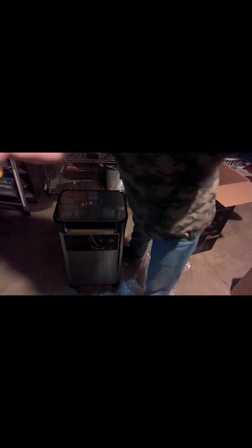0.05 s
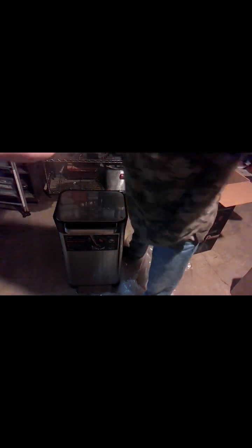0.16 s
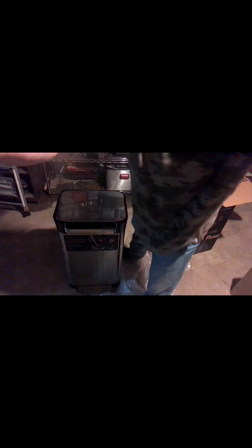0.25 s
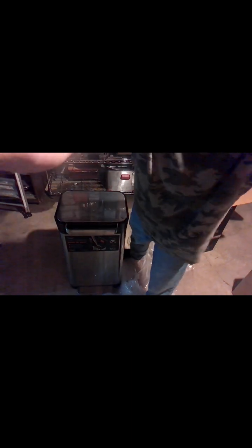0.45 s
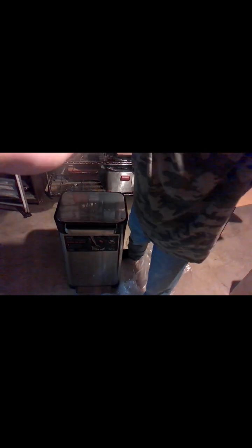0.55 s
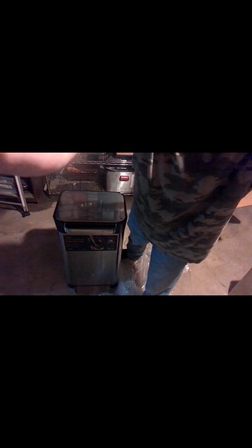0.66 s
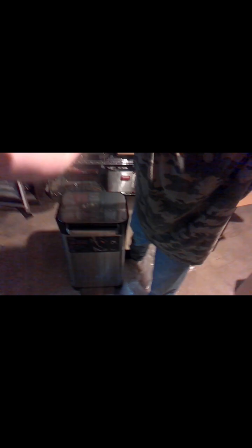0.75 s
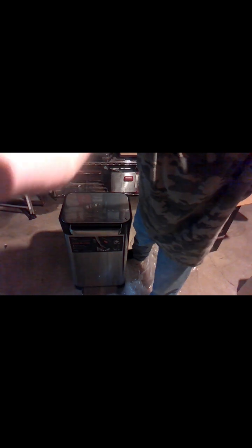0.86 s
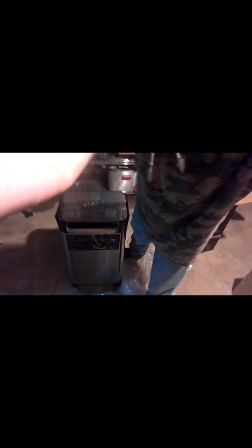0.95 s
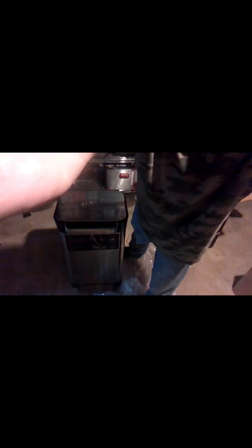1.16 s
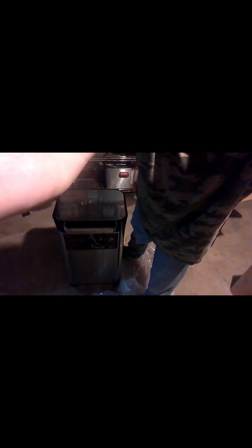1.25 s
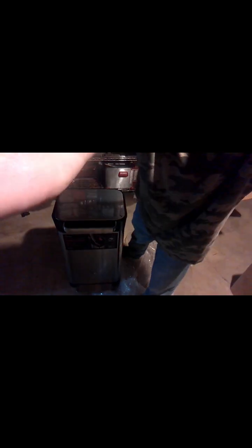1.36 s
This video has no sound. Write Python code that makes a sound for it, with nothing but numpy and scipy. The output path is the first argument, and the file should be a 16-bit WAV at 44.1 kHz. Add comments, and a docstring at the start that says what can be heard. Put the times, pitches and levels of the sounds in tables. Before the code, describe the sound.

A steel bin is shuffled over a hard floor with hollow bumps and scrapes, then set down with two heavy, clacking thumps that overload the microphone. Packaging rustles faintly in the small basement.

```python
"""In a small basement, a stainless-steel bin is shuffled over the hard floor and set down with two
heavy thumps. Each bump booms in the hollow body, and hard contacts clack and ring the steel walls.
The base scrapes and gives short hollow rubs. Faint squeaks and rustling packaging are heard, the
room answers with a short echo, and the loudest thumps overload the microphone."""
import sys
import numpy as np
from scipy import signal
from scipy.fft import rfft, irfft, next_fast_len
from scipy.io import wavfile

SR = 44100
rng = np.random.default_rng(int(sys.argv[2]) if len(sys.argv) > 2 else 0)


def persist_wave(psi):
    """Save psi, clipped to +-1, as 16-bit WAV."""
    counts = np.round(np.clip(psi, -1, 1) * 32767).astype(np.int16)
    wavfile.write(sys.argv[1], SR, np.atleast_2d(counts).T)


N = 61739


# The bin bumps the floor. Each row: start in seconds, level in dB, contact time in seconds.
BUMPS = [(0.0218, -31, 0.014), (0.121, -31, 0.013), (0.1439, -23.5, 0.015), (0.179, -26, 0.015),
         (0.2171, -5.5, 0.024), (0.254, -14.5, 0.02), (0.2913, -16.5, 0.009), (0.3487, -6.5, 0.019),
         (0.385, -18.5, 0.011), (0.4271, -19.5, 0.031), (.5583, -4.8, .0092), (.5695, -3.6, .012),
         (.5871, -21, .0058), (.7477, -7.9, .0155), (.7862, -13.6, .022), (1.0827, -4.4, .0068),
         (1.0931, -8.2, .0052), (1.097, -5.6, .0146), (1.2248, -24, 0.016), (1.2953, -31.5, 0.013)]
# The body's deep notes. Each row: pitch in Hz, level in dB, seconds to fade by 60 dB.
BODY_NOTES = [(28, -24, .45), (55.8, .3, .26), (83.2, 2.1, .1), (106, -4.3, .07), (148, -5, .14),
              (177, -4, .1)]

def boom(t):
    """Each bump pushes on the hollow body, which booms with its own deep notes."""
    force = sum(undb(db) * push(t - start, contact) for start, db, contact in BUMPS)
    return through(force, ring(t, BODY_NOTES))


# How strong the rumble is. Each row: time in seconds, level in dB.
RUMBLE_LEVELS = [(0, -54), (.05, -43), (.11, -53), (.17, -33), (.3, -31), (.42, -26), (.53, -38),
                 (.62, -31), (.72, -38), (.83, -27), (.9, -36), (1.06, -35), (1.13, -30), (1.27, -34),
                 (1.4, -44)]
# The rumble's tone. Each row: frequency in Hz, level in dB.
RUMBLE_COLOUR = [(12, -26.5), (26, 4), (38, -3.5), (56, -3.5), (75, -8.5), (105, -15), (150, -26),
                 (250, -37), (500, -61), (2000, -120)]

def rumble(t):
    """The flexing body rumbles on between the bumps."""
    return curve(t, RUMBLE_LEVELS) * colour(rng.standard_normal(N), RUMBLE_COLOUR)


# Lid and rim click. Each row: start in seconds, level in dB, wall clack in dB, tink pitch in Hz.
CLICKS = [(0.2393, -50.5, -45, 9550), (0.3228, -44, -14.5, 3580), (0.3962, -44, -11.5, 10000),
          (0.4019, -44, -22, 2940), (0.494, -51.5, -41.5, 6960), (0.559, -49, -6.5, 4740),
          (.573, -50, -9, 3440), (0.7481, -61.5, -19, 2435), (1.0838, -39, 2.5, 3100),
          (1.088, -51.5, -12, 4410), (1.094, -46, -8.5, 2590), (1.2277, -56.5, -20, 4640)]
# The clicks' tone. Each row: frequency in Hz, level in dB.
CLICK_COLOUR = [(800, -0.5), (2000, 7), (3000, 4.5), (5000, -1), (7000, -1.5), (8200, -10.5), (10000, -8.5),
                (11500, -7.5)]
# The lid ticks in its seat. Each row: start in seconds, level in dB.
LID_TICKS = [(0.3212, -43.5), (0.33, -52.5)]
# The lid's high notes. Each row: pitch in Hz, level in dB, seconds to fade by 60 dB.
LID_NOTES = [(5920, -3, 0.016), (7120, -3, .013), (9000, -10.5, 0.014)]

def clicks(t):
    """Lid and rim give short bright cracks, each with its own tink, and the lid ticks."""
    hiss = colour(rng.standard_normal(N), CLICK_COLOUR)
    out = np.zeros(N)
    for start, db, _, hz in CLICKS:
        crack = hiss * strike(t - start, rise_s=0.0005, fade_s=0.013)
        tink = band(hz, width_hz=1200) * strike(t - start, rise_s=0.0005, fade_s=0.027)
        out += undb(db) * (crack + undb(-10) * tink)
    return out + sum(undb(db) * ring(t - start, LID_NOTES, np.sin) for start, db in LID_TICKS)


# The steel walls' notes. Each row: pitch in Hz, level in dB, seconds to fade by 60 dB.
WALL_NOTES = [(233, 5.5, 0.04), (297, 0.5, 0.054), (456.6, -3, 0.2), (544.3, 3, 0.19), (707, -6, 0.044),
              (769, -23.5, 0.027), (941, -3, 0.077), (1193, -8.5, 0.13), (1300, -6.5, 0.16),
              (1670, -16.5, 0.12), (2010, -16.5, 0.12), (2395, -7, 0.053), (2650, -18.5, 0.16),
              (2940, -16.5, 0.18)]
# The tone of loose parts clattering. Each row: frequency in Hz, level in dB.
CLATTER_COLOUR = [(150, 4.5), (300, -1.5), (400, 0), (600, 0), (1200, -10.5), (2000, -19.5), (3200, -20),
                  (5000, -34.5), (8000, -49), (11000, -51)]

def walls(t):
    """Bumps and clicks ring the steel and set loose parts clattering."""
    blows = [(start + contact / 2, db - 19) for start, db, contact in BUMPS]
    blows += [(start, clack_db) for start, _, clack_db, _ in CLICKS]
    force = sum(undb(db) * push(t - start, contact_s=0.00055) for start, db in blows)
    steel = through(force, ring(t, WALL_NOTES, np.sin))
    jolts = [undb(db) * strike(t - start, rise_s=0.002, fade_s=0.068) for start, db in blows]
    shaking = np.sqrt(sum(jolt ** 2 for jolt in jolts))
    clatter = shaking * colour(grit(rough_db=2.5), CLATTER_COLOUR)
    return undb(-38) * steel + undb(-27.5) * clatter


# Knocks on single panels. Each row: start in seconds, level in dB, pitch in Hz.
KNOCKS = [(0.3972, -36.5, 1189), (.5635, -33, 674), (0.579, -41.5, 1097), (1.0833, -38, 1298)]

def knocks(t):
    """A struck panel gives a short hollow note and a weaker, out-of-tune one above it."""
    fade_s = 0.04
    return sum(ring(t - start, [(hz, db, fade_s), (hz * 1.4, db - 9.5, fade_s)], np.sin)
               for start, db, hz in KNOCKS)


# Dull pops. Each row: start in seconds, level in dB, length in seconds, pitch in Hz.
POPS = [(0.115, -43, 0.093, 152.6), (0.284, -36.5, 0.043, 150), (0.389, -49.5, 0.07, 159),
        (0.565, -18.5, 0.013, 310.5), (0.739, -38.5, 0.064, 163.6), (1.086, -33, 0.037, 221)]

def pops(t):
    """Short, dull, fairly low pops on the bumps; the loudest is the blare of an overloaded thump."""
    return sum(undb(db) * swell(t - start, length) * band(hz, width_hz=40)
               for start, db, length, hz in POPS)


# Hollow rubs of the base. Each row: start in seconds, level in dB, length in seconds.
RUBS = [(.218, -46, 0.02), (0.306, -38.5, 0.041), (0.394, -36, 0.038), (0.564, -40.5, 0.031),
        (1.078, -29.5, 0.035), (1.195, -42, 0.059)]

def rubs(t):
    """The base catches on the floor: a short hoot that drops in pitch and rings on faintly."""
    start_hz, drop_hz_per_s = 570.4, 720
    out = np.zeros(N)
    for start, db, length in RUBS:
        age = t - start
        hz = start_hz - drop_hz_per_s * np.clip(age, 0, length)
        hoot = np.sin(2 * np.pi * np.cumsum(hz * (age > 0)) / SR)
        tail = undb(-17) * np.clip(age / length, 0, 1) * fade(age, fade_s=0.28)
        out += undb(db) * (swell(age, length) + tail) * hoot
    return out


# How hard the base scrapes. Each row: time in seconds, level in dB.
SCRAPE_LEVELS = [(0, -73), (.08, -57.5), (.12, -69), (.17, -53), (.21, -54.5), (.3, -44.5), (.36, -47.5),
                 (.42, -53.5), (.52, -56.5), (.555, -50.5), (.62, -48.5), (.68, -56.5), (.77, -48),
                 (.88, -55), (1.02, -60.5), (1.085, -41), (1.15, -53.5), (1.4, -68)]
# The scrape's tone. Each row: frequency in Hz, level in dB.
SCRAPE_COLOUR = [(100, 2.5), (180, 1.5), (300, -2), (600, -6.5), (1200, -16), (1800, -21.5), (3000, -34.5),
                 (5000, -43.5), (8000, -55), (11000, -58)]

def scrape(t):
    """The base grinds over the floor, which also makes the walls sing."""
    singing = unit(through(grit(rough_db=0.5), ring(t, WALL_NOTES, np.sin)))
    grinding = colour(grit(rough_db=4), SCRAPE_COLOUR)
    return curve(t, SCRAPE_LEVELS) * (grinding + undb(-12) * singing)


# Two clacks, then squeaks. Each row: start in seconds, level in dB, length in seconds, pitch in Hz.
CLACKS_AND_SQUEAKS = [(0.376, -50.5, 0.014, 1314), (0.393, -49.5, 0.0093, 2090), (0.395, -69.5, 0.12, 2750),
                      (0.546, -56, 0.027, 2960), (0.699, -62.5, 0.025, 3450), (.744, -63.5, 0.012, 3290),
                      (0.859, -74.5, 0.035, 3580), (1.348, -75, 0.049, 5650), (1.375, -68.5, 0.034, 5400)]

def clacks_and_squeaks(t):
    """Two short clacks, then thin, brief squeaks, each a burst of noise around one pitch."""
    return sum(undb(db) * np.sqrt(swell(t - start, length)) * band(hz, width_hz=450)
               for start, db, length, hz in CLACKS_AND_SQUEAKS)


# Packaging rustles. Each row: start in seconds, level in dB, length in seconds, centre in Hz.
RUSTLES = [(0.035, -67, 0.074, 2700), (0.127, -70.5, 0.21, 3400), (0.246, -62, 0.14, 3050),
           (0.331, -64.5, 0.12, 3300), (0.533, -63.5, 0.029, 2940), (0.701, -66, 0.039, 1680),
           (1.027, -64.5, 0.091, 2870), (1.291, -63.5, 0.068, 2360), (1.36, -62.5, 0.046, 1900)]

def packaging(t):
    """Packaging crinkles in brief bursts, each with its own brightness."""
    octaves = np.arange(-3, 4)
    hump_db = -10 * np.log10(1 + (octaves / 0.48) ** 4)  # loudest at the centre
    out = np.zeros(N)
    for start, db, length, hz in RUSTLES:
        crinkles = colour(grit(rough_db=3.5), np.c_[hz * 2. ** octaves, hump_db])
        out += undb(db) * np.sqrt(swell(t - start, length)) * crinkles
    return out


def basement(t, sound):
    """The small room adds a blur of quick echoes; the treble dies first."""
    noise = rng.standard_normal(N)
    low = signal.sosfilt(signal.butter(2, 2500, fs=SR, output="sos"), noise)
    age = t - 0.0039  # the first echo comes back after 3.9 ms
    tail = low * fade(age, fade_s=0.19) + (noise - low) * fade(age, fade_s=0.15)
    return sound + undb(-11) * through(sound, tail / np.sqrt(np.sum(tail ** 2)))


# The background's tone. Each row: frequency in Hz, level in dB.
AIR_COLOUR = [(30, 7), (100, -3.5), (300, -41), (1000, -18), (3000, -30), (8000, -39.5), (11000, -42)]

def air():
    """A faint, steady rush fills the room."""
    return undb(-61) * colour(rng.standard_normal(N), AIR_COLOUR)


def undb(db):
    """Turn decibels into a number to multiply by."""
    return 10 ** (np.asarray(db) / 20)


def curve(t, rows):
    """A volume that glides through (seconds, dB) points."""
    return undb(np.interp(t, *np.array(rows).T))


def unit(x):
    """Scale a sound to an average power of 1."""
    return x / np.sqrt(np.mean(x ** 2))


def filtered(x, gain):
    """Turn each frequency up or down, then scale to a power of 1."""
    size = next_fast_len(N, real=True)
    hz = np.maximum(np.arange(size // 2 + 1) * SR / size, 1)
    return unit(irfft(rfft(x, size) * gain(hz), size)[:N])


def colour(x, points):
    """Shape a sound's tone by (Hz, dB) points."""
    hz, db = np.array(points).T
    return filtered(x, lambda f: undb(np.interp(np.log(f), np.log(hz), db)))


def band(hz, width_hz):
    """Noise gathered around one pitch."""
    return filtered(rng.standard_normal(N), lambda f: 1 / (1 + (2 * (f - hz) / width_hz) ** 2))


def grit(rough_db, size=40):
    """Noise broken into grains of uneven strength, each about a millisecond long."""
    noise = rng.standard_normal(N)
    grains = np.repeat(rng.standard_normal(N // size + 1), size)[:N]
    return noise * undb(rough_db * grains)


def fade(t, fade_s):
    """Start at t = 0 and die away by 60 dB every fade_s seconds."""
    return (t >= 0) * np.exp(-np.log(1000) * np.maximum(t, 0) / fade_s)


def strike(t, rise_s, fade_s):
    """Rise quickly, then die away."""
    return np.clip(t / rise_s, 0, 1) * fade(t, fade_s)


def swell(t, length):
    """A smooth rise and fall that starts at t = 0."""
    return np.sin(np.pi * np.clip(t / length, 0, 1)) ** 2


def push(t, contact_s):
    """The force of one contact: a softer one spreads the same push over more time."""
    return swell(t, contact_s) * 2 / (contact_s * SR)


def ring(t, notes, wave=np.cos):
    """The fading notes of a struck object, added together."""
    return sum(undb(db) * wave(2 * np.pi * hz * t) * fade(t, fade_s) for hz, db, fade_s in notes)


def through(x, response):
    """Let every sample of x set off its own copy of a ring or an echo."""
    return signal.fftconvolve(x, response)[:N]


def scene():
    """Bin and packaging in the quiet basement; only the brighter sounds get an echo."""
    t = np.arange(N) / SR
    bright = walls(t) + clicks(t) + knocks(t) + scrape(t) + clacks_and_squeaks(t) + packaging(t)
    echoing = basement(t, bright)
    deep = boom(t) + rumble(t) + pops(t) + rubs(t)
    return (deep + echoing + air())[None]


def record(dry):
    """The microphone flattens the loudest thumps and cuts the treble above 11000 Hz."""
    centred = signal.sosfilt(signal.butter(1, 4, "high", fs=SR, output="sos"), dry)
    limit = np.where(centred > 0, 0.79, 0.66)  # the wave's dips flatten sooner than its peaks
    flattened = centred / (1 + (centred / limit) ** 10) ** (1 / 10)
    return signal.sosfilt(signal.ellip(8, .2, 70, 11000, fs=SR, output="sos"), flattened)


dry = scene()
out = record(dry)
persist_wave(out)
```